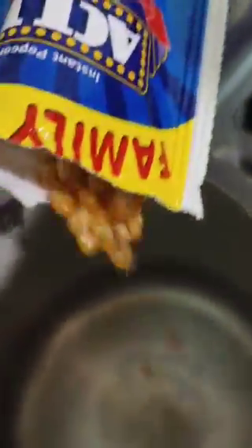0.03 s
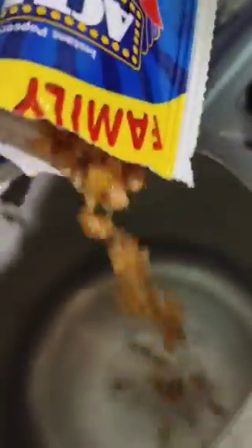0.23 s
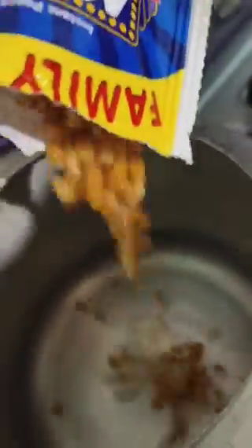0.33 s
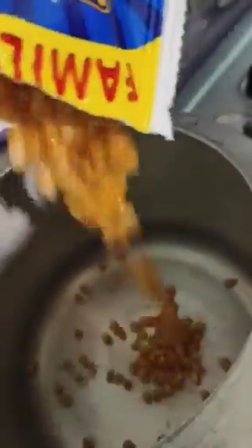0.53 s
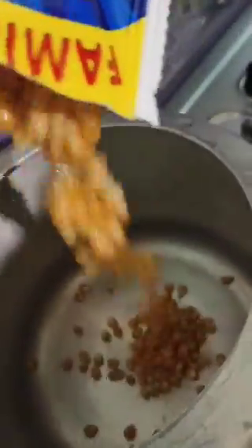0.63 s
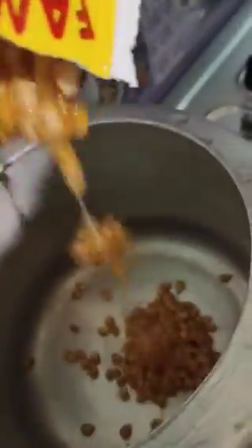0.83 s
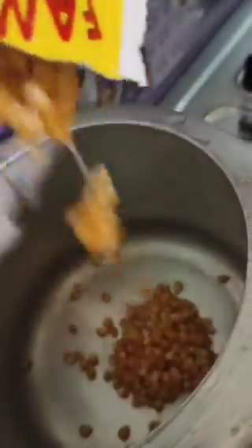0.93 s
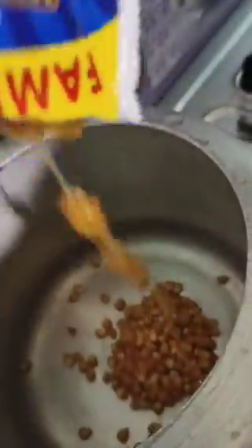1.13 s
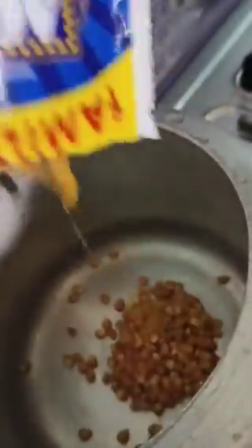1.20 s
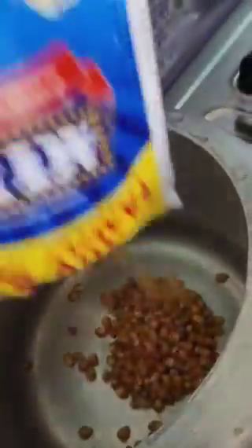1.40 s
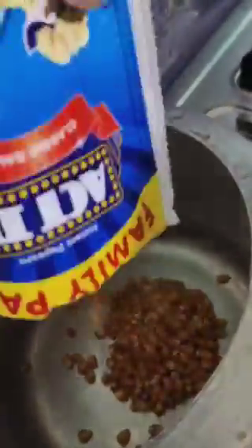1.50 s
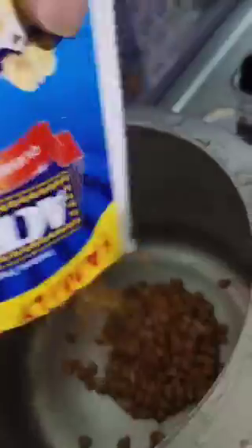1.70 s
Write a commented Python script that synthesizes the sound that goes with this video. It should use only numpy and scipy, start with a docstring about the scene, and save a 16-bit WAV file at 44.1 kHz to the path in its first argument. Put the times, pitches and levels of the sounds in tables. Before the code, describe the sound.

Hard popcorn kernels clatter into a steel pot, then a plastic packet crackles.

```python
"""First a low, wavering kitchen hum and a dull tock, then hard popcorn kernels pour into a steel pot.
The first kernels ring the bare bottom; the growing heap damps it until kernels mostly click on kernels.
Then the plastic packet crackles as it is shaken and tipped back, its creases snapping.
Each hit is a short burst of shaped noise; the pot's ring is a set of fading pure tones."""
import sys
import numpy as np
from scipy import signal
from scipy.fft import rfft, irfft, next_fast_len
from scipy.io import wavfile

SR = 44100
rng = np.random.default_rng(int(sys.argv[2]) if len(sys.argv) > 2 else 0)


def master_out(mix):
    """Clip the mix to full scale and print it as 16-bit PCM to the path in sys.argv[1]."""
    frames = np.transpose(np.atleast_2d(mix))
    ceiling = np.clip(frames, -1, 1)
    pcm = np.round(ceiling * 32767).astype(np.int16)
    wavfile.write(sys.argv[1], SR, pcm)


N = 77175
TIME_S = np.arange(N) / SR
HIT_TIME_S = np.arange(SR // 3) / SR  # the clock of one hit
TOP_HZ = 15900


def amp(db):
    """Turn decibels into a gain."""
    return 10 ** (np.asarray(db) / 20)


def unit(x):
    """Scale to an average (rms) level of 1."""
    return x / np.sqrt(np.mean(x ** 2) + 1e-20)


def along(points, hz):
    """Read between a table's rows on a log frequency axis."""
    row_hz, values = np.transpose(points)
    return np.interp(np.log(hz + 1), np.log(row_hz + 1), values)


def swell(rows):
    """A gain that glides through rows of time_s, level_db."""
    return amp(np.interp(TIME_S, *np.transpose(rows)))


def fade(seconds):
    """Die away by 60 dB in this time."""
    return amp(-60 * HIT_TIME_S / seconds)


def add(out, start_s, sound):
    """Mix a stereo sound in."""
    i = round(start_s * SR)
    out[:, i:i + sound.shape[1]] += sound[:, :max(N - i, 0)]


def filtered(x, response):
    """Multiply each frequency by response(hz)."""
    size = next_fast_len(x.shape[-1] + 4096)
    hz = np.fft.rfftfreq(size, 1 / SR)
    return irfft(rfft(x, size) * response(hz), size)[..., :x.shape[-1]]


def coloured(x, colour_db):
    """Shape the tone by colour_db(hz), with a filter of energy 1."""
    size = 2048
    gains = np.maximum(amp(colour_db(np.fft.rfftfreq(size, 1 / SR))), 1e-5)
    cepstrum = irfft(np.log(gains))
    # make the filter ring after a hit, never before
    cepstrum[1:size // 2] *= 2
    cepstrum[size // 2 + 1:] = 0
    impulse = irfft(np.exp(rfft(cepstrum)))
    return signal.fftconvolve(x, impulse[None] / np.linalg.norm(impulse), axes=1)[:, :x.shape[1]]


def tilted(points, tilt, hz):
    """Make a tone brighter (tilt above 0) or duller, in dB per octave."""
    return along(points, hz) + tilt * np.log2(np.clip(hz, 1000, TOP_HZ))


def from_left(x, lead_s=0.000306):
    """Make a sound stereo, reaching the left side first."""
    return filtered(x, lambda hz: np.exp(1j * np.pi * hz * lead_s * np.array([[1], [-1]])))


def contact(spike_db, click_s, echo_db, near_db, near_s, room_db, echo_s=0.0042, room_s=0.39):
    """A click, its echo off a hard surface, a short ring nearby and the kitchen's tail."""
    noise = rng.standard_normal((7, len(HIT_TIME_S)))
    shape = fade(click_s) + amp(spike_db) * fade(0.00067)
    click = from_left(noise[0] * shape)
    echo = amp(echo_db) * np.roll(noise[1:3] * shape, round(echo_s * SR), axis=1)
    near = amp(near_db) * noise[3:5] * fade(near_s) * (1 - fade(0.0063))
    room = amp(room_db) * noise[5:] * fade(room_s) * (1 - fade(0.023))
    return click + echo + near + room


def patter(per_second, spread_db, room_db):
    """A random stream of tiny clicks."""
    sizes = amp(spread_db * np.clip(rng.standard_normal(N), -2, 2)) * rng.choice([-1, 1], N)
    hits = sizes * (rng.random(N) < per_second / SR)
    click = contact(spike_db=-6, click_s=.003, echo_db=-6, near_db=-15, near_s=.035, room_db=room_db)
    return unit(signal.fftconvolve(hits[None], click, axes=1)[:, :N])


# Levels in all tables are relative: 6 dB more is about twice as strong.
HUM_TONES = [(73, -7.5), (90, 4), (113, -4.5), (137, -16), (165, -11.5)]  # the hum's notes: pitch_hz, level_db
HUM_SWELL = [(0.0, -43), (0.18, -37.5), (0.218, -41.5), (0.238, -67), (0.276, -44.5), (0.466, -47.5),
             (0.642, -66), (0.876, -54), (1.018, -73), (1.032, -63), (1.272, -52.5), (1.388, -71),
             (1.398, -73.5), (1.75, -49)]  # its rise and fall: time_s, level_db
# Faint steady tones of the room and the pot's low ring: pitch_hz, level_db
STEADY_TONES = [(274.5, -71), (457.6, -71.5), (915.2, -76), (1324, -68), (1448, -71)]
ROOM_COLOUR = [(25, -19), (60, -8), (110, -6), (250, -2.5), (420, -5), (550, -10.5), (780, -5.5),
               (1500, -18), (2300, -14.5), (3400, -27), (5800, -21), (8500, -33), (12000, -40)]  # the room noise's tone: frequency_hz, level_db
ROOM_SWELL = [(0, -48.5), (.19, -45), (.26, -51.5), (1.2, -54), (1.42, -56), (1.75, -56)]  # its rise and fall: time_s, level_db
ROOM_LIKENESS = [(60, 0.19), (120, 0.93), (270, .55), (500, 0), (16000, 0)]  # how alike left and right are: frequency_hz, likeness_0_to_1
def kitchen():
    """A low hum that swells and sinks, faint steady tones of room and pot, and dull room noise."""
    def tones(rows):
        return sum(amp(db) * np.sqrt(2) * np.sin(2 * np.pi * (hz * TIME_S + rng.random()))
                   for hz, db in rows)

    def room_tone(hz):
        width = np.arccos(along(ROOM_LIKENESS, hz)) / 2
        return amp(along(ROOM_COLOUR, hz)) * [np.cos(width), np.sin(width)]

    mid, side = filtered(rng.standard_normal((2, N)), room_tone)
    room_noise = unit(np.array([mid + side, mid - side])) * swell(ROOM_SWELL)
    hum = unit(tones(HUM_TONES)) * swell(HUM_SWELL)
    return hum + tones(STEADY_TONES) + room_noise


DULL_TOCKS = [(0.196, -36, 1265), (0.285, -37.5, 1170), (1.503, -28, 1205)]  # hollow knocks: start_s, level_db, pitch_hz
def tocks():
    """Short hollow knocks, as when the packet's wall buckles."""
    out = np.zeros((2, N))
    for start_s, level_db, pitch_hz in DULL_TOCKS:
        knock = from_left(np.sin(2 * np.pi * pitch_hz * HIT_TIME_S) * fade(0.016) * (1 - fade(0.0026)))
        tail = rng.standard_normal((2, len(HIT_TIME_S))) * fade(0.084) * (1 - fade(0.046))
        tail = coloured(tail, lambda hz: -24 * np.abs(np.log2((hz + 1) / pitch_hz)))
        add(out, start_s, amp(level_db + 13.5) * (knock + amp(-18) * tail))
    return out


def pot_ripple(spacing_hz=90, depth_db=3):
    """The pot's many weak resonances, the same for every kernel: frequency_hz, level_db."""
    hz = np.arange(1000, TOP_HZ, spacing_hz)
    return np.column_stack([hz, depth_db * np.clip(rng.standard_normal(len(hz)), -2, 2)])


POT_NOTES = [(2240, 45, -5), (3310, 49, 0), (4470, 44, -3), (5560, 87, -6), (6170, 140, -3),
             (6560, 120, -2), (7590, 140, -1), (9140, 41, -8), (10700, 78, -9), (11600, 75, -6),
             (13100, 110, -5), (13800, 63, -5), (14700, 39, -4), (15300, 59, -3)]  # the bottom's ringing notes: pitch_hz, spread_hz, level_db
def pot_ring():
    """The steel bottom rings; strength and tuning vary with where the kernel lands."""
    lowest_hz, lowest_spread_hz, _ = POT_NOTES[0]
    out = 0
    for pitch_hz, spread_hz, level_db in POT_NOTES:
        detune, strength = rng.standard_normal(2)
        phase = rng.uniform(0, 2 * np.pi) + rng.normal(0, 1.0, (2, 1))
        ring_s = 0.25 * (pitch_hz / lowest_hz) ** -0.45  # higher notes die sooner
        gain = np.sqrt(spread_hz / lowest_spread_hz) * amp(level_db + 1.2 * strength)
        hz = pitch_hz + 0.307 * spread_hz * detune
        out = out + gain * fade(ring_s) * np.sin(2 * np.pi * hz * HIT_TIME_S + phase)
    return from_left(out)


STEEL_LANDINGS = [(0.2184, -3, -1.5), (0.3124, -4.5, -1.5), (0.3477, -5.5, 1), (0.3611, -3.5, -0.5),
                  (0.3804, -6, 1), (0.3914, -18, -3), (0.4014, -7, -1), (0.4264, -7.5, -3.5),
                  (0.4324, -5.5, -1), (0.4564, -6.5, 2), (0.4614, -3, 0.5), (0.4734, -42, 3),
                  (0.4914, -10, -1), (0.5034, -9, 1.5), (0.5224, -13.5, -1.5), (0.5851, -7.5, -1.5),
                  (0.6394, -10, -1), (0.6769, -17.5, -2), (0.6888, -12, -1.5)]  # kernels hitting steel: start_s, level_db, tilt_db_per_octave
STEEL_COLOUR = [(530, -51), (900, -43), (1000, -39.5), (1790, -23.5), (2190, -4.5), (2730, -13), (3260, -4),
                (3680, -18), (4410, -6.5), (4860, -8), (6410, -2), (7060, -12), (7770, 0.5), (8350, -18),
                (8980, -6.5), (11000, -6), (12000, -3), (15200, -4.5), (16000, -6)]  # their tone: frequency_hz, level_db
def kernels_on_steel(ripple, cover_start_s=0.52, muting_db_per_s=26):
    """Each kernel cracks on the bottom and rings it, less as the heap covers it."""
    out = np.zeros((2, N))
    for start_s, level_db, tilt in STEEL_LANDINGS:
        crack = contact(spike_db=4, click_s=0.023, echo_db=-2, near_db=-1, near_s=0.072, room_db=-9)
        crack = coloured(crack, lambda hz: tilted(STEEL_COLOUR, tilt, hz) + along(ripple, hz))
        muting_db = muting_db_per_s * max(start_s - cover_start_s, 0)
        ring = amp(-13 - muting_db) * pot_ring()
        add(out, start_s, amp(level_db - 10) * (crack + ring))
    return out


def pot_wall(start_s=0.5, pitch_hz=1216, ring_s=2.1):
    """The pot's wall sings on quietly after the heaviest hits."""
    age_s = np.maximum(TIME_S - start_s, 0)
    return from_left(amp(-51 - 60 * age_s / ring_s) * np.sin(2 * np.pi * pitch_hz * age_s))


def kernel_tick(typical_hz=5400, scatter_octaves=0.4):
    """Each kernel ticks briefly at its own pitch."""
    pitch_hz = typical_hz * 2 ** (scatter_octaves * rng.standard_normal())
    return amp(-8) * from_left(np.sin(2 * np.pi * pitch_hz * HIT_TIME_S) * fade(0.027))


HEAP_LANDINGS = [(0.7245, -21.5, 2.5), (0.7513, -22, -0.5), (0.7858, -18.5, 1), (0.8002, -25, -3.5),
                 (0.8162, -14, 2), (0.853, -17.5, 5), (0.8744, -21, 8), (0.8837, -20, 11),
                 (0.9043, -14, 9.5), (0.912, -17, 2.5), (0.9231, -22, 4), (1.112, -30, -0.5)]  # kernels hitting the heap: start_s, level_db, tilt_db_per_octave
HEAP_COLOUR = [(530, -47), (900, -29), (1080, -22), (1310, -7), (1550, -15), (2170, -2.5), (2470, -5),
               (3230, -1.5), (4860, 1), (8450, -6.5), (15100, -10.5), (16000, -12.5)]  # their tone: frequency_hz, level_db
TRICKLE_SWELL = [(.31, -100), (.36, -50), (.48, -38), (.56, -40.5), (.67, -37), (.72, -36), (.77, -53),
                 (.85, -41.5), (.92, -32), (.97, -48), (1.1, -42), (1.2, -100)]  # small hits between the loud ones: time_s, level_db
def kernels_on_heap(ripple):
    """Dry clicks of kernel on kernel barely ring the pot; smaller ones trickle through the pour."""
    out = np.zeros((2, N))
    for start_s, level_db, tilt in HEAP_LANDINGS:
        click = contact(spike_db=3, click_s=0.013, echo_db=-3, near_db=2, near_s=0.068, room_db=-11)
        click = coloured(click, lambda hz: tilted(HEAP_COLOUR, tilt, hz) + along(ripple, hz))
        add(out, start_s, amp(level_db - 8.5) * (click + kernel_tick() + amp(-19) * pot_ring()))
    trickle = patter(per_second=200, spread_db=3.5, room_db=-22) * swell(TRICKLE_SWELL)
    return out + coloured(trickle, lambda hz: along(HEAP_COLOUR, hz) + along(ripple, hz))


# Creases snapping: start_s, level_db, tilt_db_per_octave, hollow_db, fade_s
CREASE_SNAPS = [(0.9733, -13.5, 4.5, 1.5, 0.014), (0.9847, -17, 2, -16, 0.023),
                (0.997, -18, 1.5, -10, 0.015), (1.007, -24.5, -0.5, -11, 0.023),
                (1.04, -23, -3, -5.5, 0.0079), (1.0627, -8.5, 2, 3.5, 0.012),
                (1.1279, -29.5, -3, -9, 0.012), (1.1614, -23.5, 1, 3.5, 0.021),
                (1.1728, -16.5, 2, 5, 0.027), (1.1899, -23, -1, -7, 0.014), (1.2295, -25, -0.5, -3, 0.013),
                (1.27, -21.5, 2, 13, 0.021), (1.2899, -28.5, 1.5, 4, 0.022), (1.318, -34, -7, -3, 0.0091),
                (1.3339, -13, 5.5, 9.5, 0.014), (1.345, -21.5, 2, 6, 0.018), (1.3687, -23, 3, 12.5, 0.015),
                (1.3776, -28, 5, 9, 0.022), (1.4751, -7.5, -3, -23, 0.0096),
                (1.4834, -14.5, -1.5, -18, 0.013), (1.5271, -29, -5.5, -5, 0.01),
                (1.585, -14, 4.5, 12.5, 0.0089), (1.6047, -23.5, 4, 7, 0.012), (1.6464, -23.5, 5, 12, 0.02),
                (1.651, -34, 2, 9, 0.0074), (1.6913, -25, 2, 2, 0.011), (1.7083, -18, 6, 17, 0.011),
                (1.713, -12.5, 8, 15, 0.011), (1.728, -30, 1, 1, 0.011), (1.7354, -25.5, 0, 5.5, 0.011)]
PLASTIC_COLOUR = [(350, -34), (600, -9.5), (1210, -4.5), (1390, 1), (1780, -7.5), (1980, 3), (2440, -7.5),
                  (3160, 1), (3480, -3.5), (5950, 3.5), (8390, -2), (12700, 1), (16000, -4)]  # the plastic's tone: frequency_hz, level_db
RUSTLE_SWELL = [(.9, -100), (.99, -29.5), (1.04, -55), (1.15, -66), (1.19, -46), (1.22, -57), (1.26, -57),
                (1.29, -41), (1.38, -44.5), (1.41, -77), (1.47, -52.5), (1.51, -32.5), (1.56, -47),
                (1.7, -64), (1.74, -42)]  # fine crinkles: time_s, level_db
def packet(hollow_hz=1330, hollow_octaves=0.69):
    """Creases snap and sound the packet's hollow; finer crinkles fill the gaps."""
    out = np.zeros((2, N))
    hollow = lambda hz: np.exp(-(np.log2(np.maximum(hz / hollow_hz, 1)) / hollow_octaves) ** 2)
    for start_s, level_db, tilt, hollow_db, fade_s in CREASE_SNAPS:
        snap = contact(spike_db=2, click_s=fade_s, echo_db=-5.5,
                       near_db=-1.5, near_s=4.16 * fade_s, room_db=-16.5)
        snap = coloured(snap, lambda hz: tilted(PLASTIC_COLOUR, tilt, hz) + hollow_db * hollow(hz))
        add(out, start_s, amp(level_db - 7.5) * snap)
    rustle = patter(per_second=390, spread_db=3, room_db=-18) * swell(RUSTLE_SWELL)
    return out + coloured(rustle, lambda hz: along(PLASTIC_COLOUR, hz))


LEFT_LEAN = [(100, -.5), (380, 5.5), (700, -2), (1300, 4), (2400, 4), (4400, 5.5), (8100, 0.5), (15000, 1)]  # stereo balance: frequency_hz, left_minus_right_db
def scene():
    """Everything together, a little to the left."""
    ripple = pot_ripple()
    pour = kernels_on_steel(ripple) + pot_wall() + kernels_on_heap(ripple)
    mix = pour + packet() + tocks() + kitchen()
    return filtered(mix, lambda hz: amp(along(LEFT_LEAN, hz) * np.array([[.5], [-.5]])))


def record(dry):
    """Cut off the very highest treble."""
    return filtered(dry, lambda hz: np.clip((TOP_HZ - hz) / 400 + .5, 0, 1))


dry = scene()
out = record(dry)
master_out(out)
```